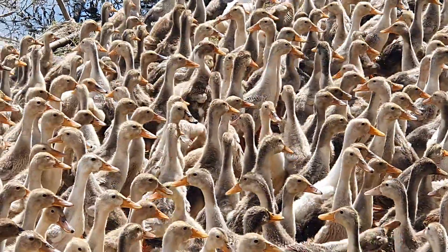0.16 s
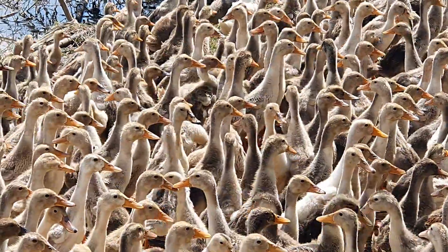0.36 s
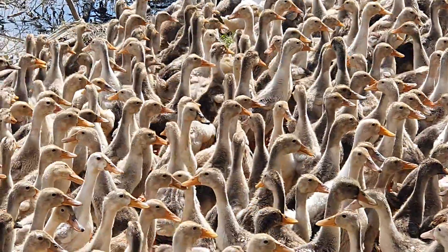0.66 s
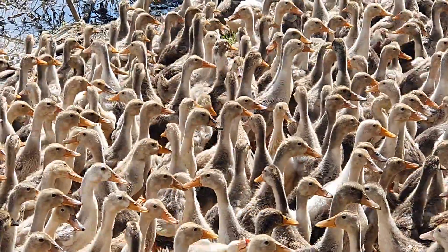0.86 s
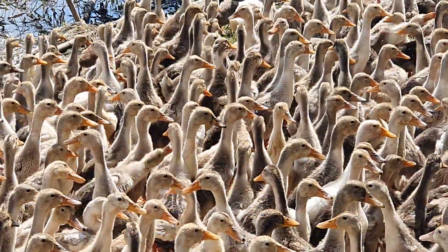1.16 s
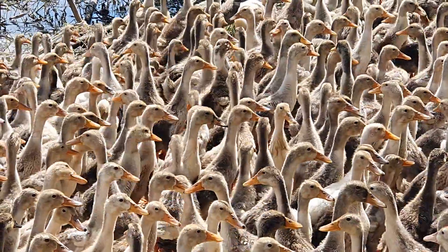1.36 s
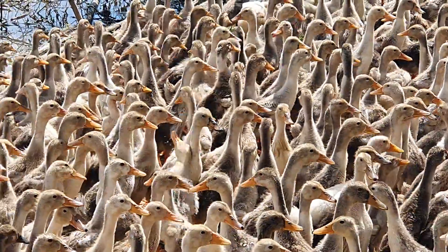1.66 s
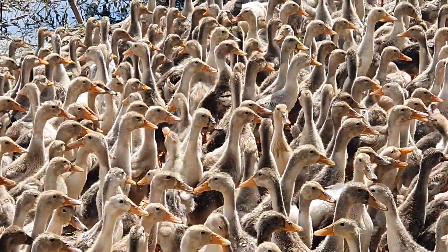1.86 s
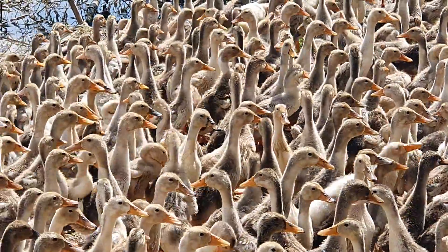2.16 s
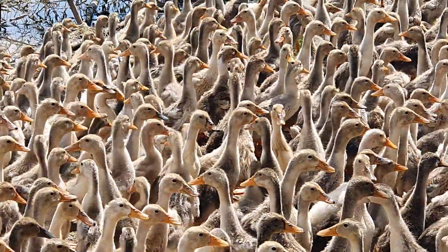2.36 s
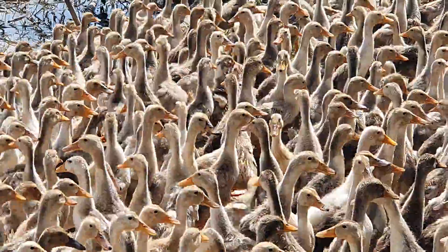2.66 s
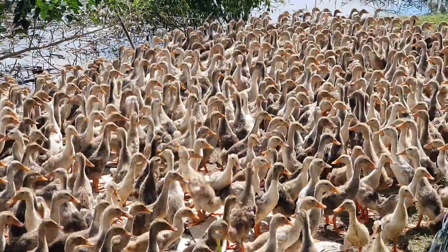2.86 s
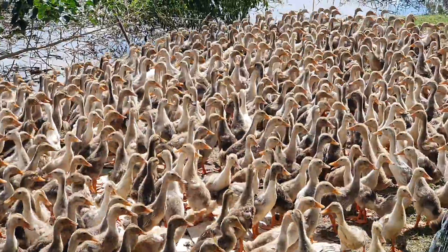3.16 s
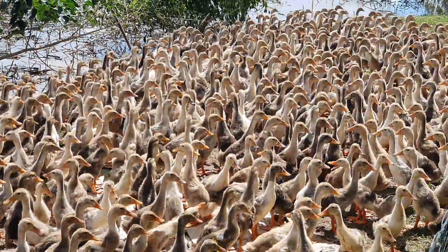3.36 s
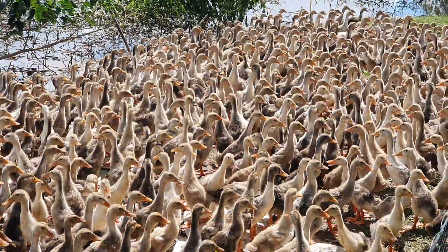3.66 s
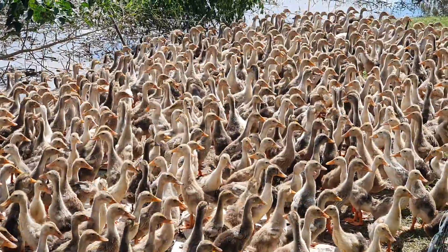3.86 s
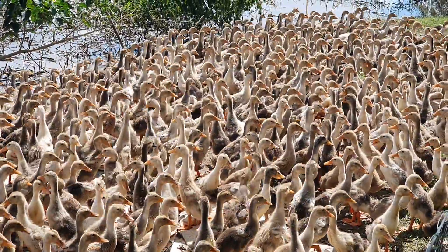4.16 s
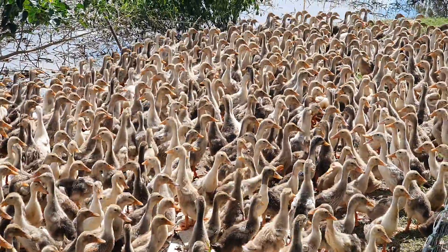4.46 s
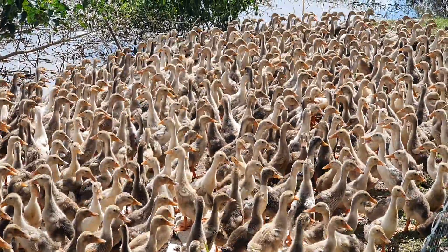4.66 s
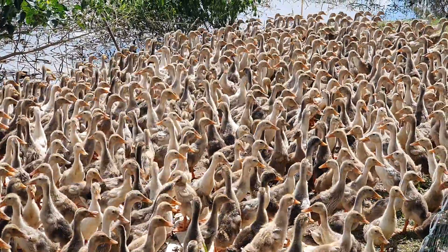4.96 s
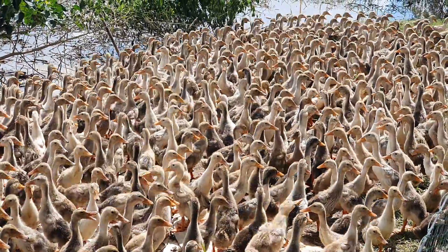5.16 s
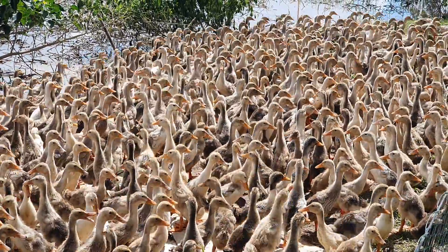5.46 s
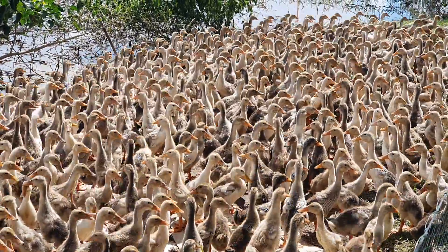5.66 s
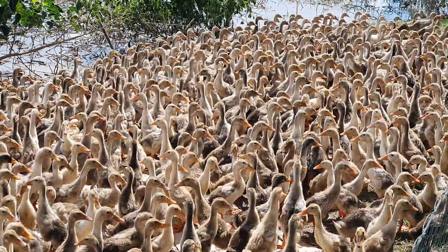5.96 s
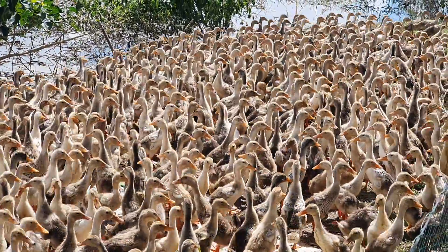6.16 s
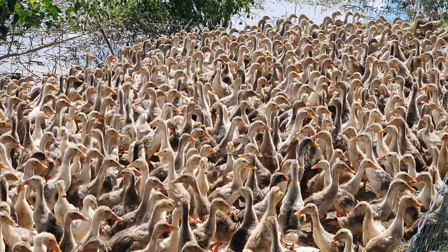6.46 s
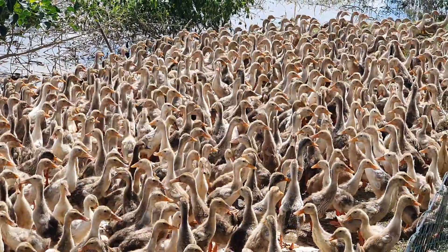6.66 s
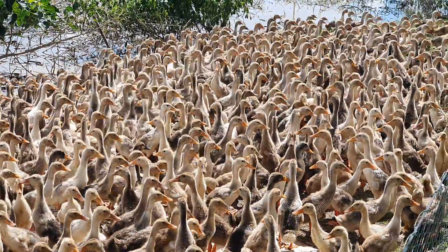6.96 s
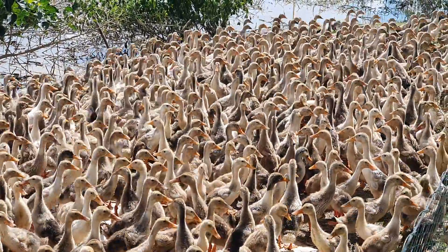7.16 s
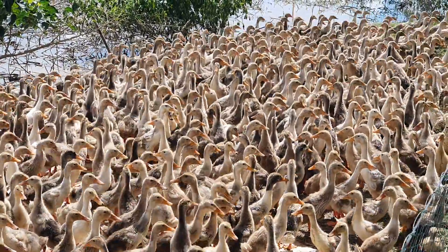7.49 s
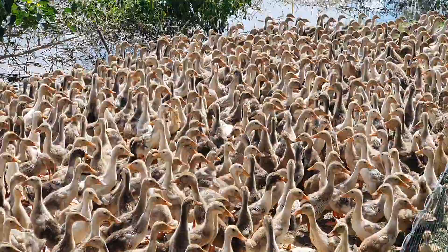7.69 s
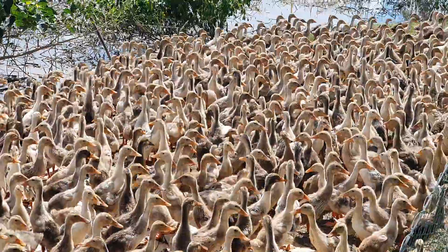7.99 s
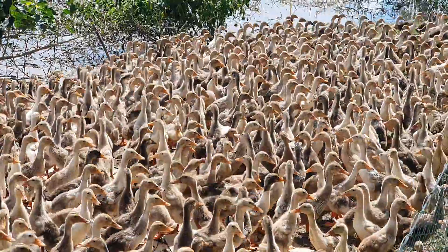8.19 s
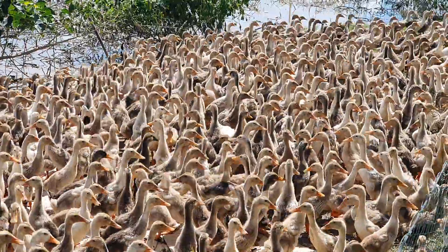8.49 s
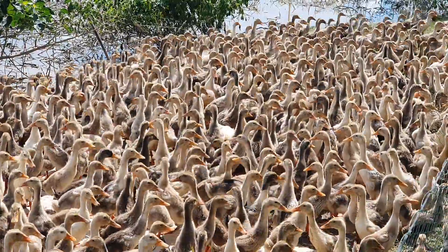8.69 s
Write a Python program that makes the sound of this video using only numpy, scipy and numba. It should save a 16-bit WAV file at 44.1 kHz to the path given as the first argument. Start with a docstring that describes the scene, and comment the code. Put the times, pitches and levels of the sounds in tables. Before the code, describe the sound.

Hundreds of young ducks peep and cluck together outdoors in a dense, continuous chorus, heard more on the right. Loud, close whistles and lower, raspy yelps poke through from the start, with a few soft quacks. Later come brief harsh squawks and thin squeals as the shrillness softens. The far birds blur into a patchy rush, and air and distant motors rumble very faintly underneath.

```python
"""An open yard, with a very large flock of young ducks calling to the right of a two-port microphone.
Most voices are still whistled peeps; breaking voices yelp an octave lower and turn hoarse as the
membrane in the throat flaps. Close by, peeps, yelps, squeals, honks, quacks and squawks stand out
with a short echo. Behind them is a dense chorus, the far flock melts into a patchy rush, and a
faint rumble of air and distant motors lies below."""
import sys
import numpy as np
from scipy import signal
from scipy.fft import rfft, irfft, next_fast_len
from scipy.io import wavfile
from scipy.ndimage import uniform_filter1d, map_coordinates
from numba import njit

SR = 44100
rng = np.random.default_rng(int(sys.argv[2]) if len(sys.argv) > 2 else 0)


def transcribe(u):
    """Save the signal u as a 16-bit wav file named by the first command-line argument.

    u: samples, shape (n,) or (channels, n), limited to [-1, 1]; the rate is SR.
    q: integer samples, one column per channel.
    """
    v = np.clip(np.atleast_2d(u).T, -1, 1)
    q = np.round(v * 32767).astype(np.int16)
    wavfile.write(sys.argv[1], SR, q)


N = 389403
TIME_S = np.arange(N) / SR
TOP_HZ, FLAP_HZ = 15720, 360  # band limit of the microphone; flap rate of a hoarse membrane

# Peeps close to the microphone: start_s, length_s, pitch_hz, climb_share_per_s, level_db, overtone_db
PEEPS = [(.082, .098, 3170, .8, -17, -22), (.16, .093, 3000, .4, -20, -3),
         (.356, 0.108, 3170, .8, -15, -14), (0.47, .088, 2960, .8, -17, -12),
         (.652, .096, 3130, .8, -17, -14), (0.75, 0.1, 2980, .8, -21.5, 0), (0.952, 0.055, 3540, 0, -33, 9),
         (0.993, 0.051, 3156, 2, -18.5, -7), (1.079, 0.094, 2875, 0.5, -23, -2),
         (1.226, 0.081, 3100, 1.7, -26.5, -7), (1.486, 0.037, 2744, 2, -27, -6),
         (1.602, 0.05, 2673, 3.5, -22, -9), (1.839, 0.1, 2725, -1.2, -22, -8),
         (1.935, 0.075, 2810, 0.5, -24.5, 3.5), (2.04, 0.083, 2440, 0.2, -28.5, 14),
         (2.09, .042, 2850, .6, -23, 6), (2.198, 0.082, 2920, 1.1, -22.5, 3),
         (2.436, 0.069, 2910, 1, -16.5, -1), (2.674, 0.089, 2890, 1.2, -15.5, -0.5),
         (2.857, 0.12, 3040, 0.8, -26, -6), (2.93, 0.058, 2820, 3, -18, -2),
         (2.978, 0.073, 3120, 2, -22.5, 14.5), (3.09, 0.063, 2705, 1, -22.5, 1.5),
         (3.286, 0.098, 2550, 1, -31, -14), (3.465, 0.064, 3265, 0, -29, -8),
         (3.751, 0.064, 2280, 1, -24, -13), (4.104, 0.057, 2450, 0, -18.5, -6),
         (4.38, 0.098, 2520, 2, -26.5, -7), (4.467, 0.082, 2180, 0, -27, 3),
         (4.657, 0.077, 2105, 1, -26, -7), (4.676, 0.04, 2460, 3.5, -32, 16),
         (4.691, 0.051, 2690, -1.5, -26, -2), (4.923, 0.078, 2295, 1.5, -23.5, 4),
         (5.14, 0.055, 2690, -1, -24, -8), (5.179, 0.084, 2276, 0, -23, -14),
         (5.237, 0.066, 2670, -1, -26, -7), (5.387, 0.055, 2804, 2, -23.5, -21),
         (5.465, 0.088, 2264, -0.5, -27, -13), (5.631, 0.072, 2387, 0.3, -20.5, -1.5),
         (6.492, 0.052, 2640, -.5, -23, -1), (6.139, 0.054, 2398, 1, -22.5, -10),
         (6.828, 0.078, 2330, -1.4, -23, -3), (7.145, 0.053, 3080, 1, -26.5, 2),
         (7.441, 0.054, 3050, 1.5, -23.5, -12), (7.71, .075, 3033, 1, -25, -2),
         (8.017, .065, 3015, 1.8, -26, 3), (7.715, 0.064, 2210, 0, -31, 0),
         (7.836, 0.1, 2610, -1, -25, -6.5), (8, 0.068, 2224, 1, -29.5, 1),
         (8.29, 0.067, 3146, 0.5, -26.5, -6), (8.587, 0.062, 3167, -0.8, -32.5, -11)]
def peeps():
    """Young birds whistle: the pitch glides, bows up in the middle and hooks down at the end."""
    start, length, hz, climb, db, overtone_db = np.transpose(PEEPS)
    glide = climb * length / 2
    arch = hz * np.array([1 - glide, np.full_like(hz, 1.016), 1 + glide])
    left_db = curves(CHORUS, start)[-1] + .24  # from the same side as the flock
    return voices(start, length, arch, db, left_db, overtone_db=overtone_db, count=2,
                  quiver=.0025, flutter_db=1.5, skew=1., edge_s=.009, hook=.12)[:2]


# One long peep, close by: start_s, length_s, start_hz, middle_hz, end_hz, level_db, overtone_db
LONG_PEEP = [(6.44, .18, 2930, 3195, 3010, -18, -8)]
def long_peep():
    """A held whistle that scoops up and sinks."""
    start, length, *arch, db, overtone_db = np.transpose(LONG_PEEP)
    return voices(start, length, np.array(arch), db, left_db=-7, overtone_db=overtone_db, count=2,
                  quiver=.002, flutter_db=1.2, skew=.55, edge_s=.022)[:2]


# Squeals close by, well to the right: start_s, length_s, pitch_hz, level_db
SQUEALS = [(5.572, .07, 5580, -33), (5.845, .075, 5580, -33), (6.12, .08, 5620, -33)]
def squeals():
    """High, raspy, arched notes; the membrane also flaps weakly at half the pitch."""
    start, length, hz, db = np.transpose(SQUEALS)
    arch = np.outer((1, 1.03, .97), hz)
    return voices(start, length, arch, db, left_db=-10.5, note_partial=2, between_db=-18, count=2,
                  quiver=.016, flutter_db=4., skew=3., edge_s=.009)[:2]


# Yelps close by: start_s, length_s, pitch_hz, level_db
YELPS = [(0.16, 0.056, 1317, -41.5), (0.232, 0.0466, 1316, -35.5), (0.303, 0.037, 1296, -36),
         (0.811, 0.067, 1482, -34.5), (1.008, 0.036, 1586, -37), (1.112, 0.047, 1480, -43),
         (1.342, 0.049, 1188, -35.5), (1.552, 0.065, 1513, -36), (1.692, 0.022, 1240, -33.5),
         (1.825, 0.0715, 1190, -35.5), (1.957, 0.0363, 1180, -35), (2.203, 0.051, 1213, -30.5),
         (2.444, 0.033, 1258, -28.5), (2.695, 0.028, 1256, -26), (2.79, 0.0346, 1210, -31),
         (2.995, 0.032, 1302, -25.5), (3.04, 0.062, 1253, -32.5), (3.141, 0.031, 1285, -35),
         (3.229, 0.061, 1380, -38), (3.366, 0.034, 1287, -31), (3.437, 0.029, 1300, -41.5),
         (3.634, 0.054, 1303, -35.5), (3.992, 0.024, 1370, -40), (4.084, 0.0392, 1352, -32),
         (4.302, 0.107, 1314, -38), (4.517, 0.039, 1400, -33), (4.621, 0.098, 1346, -39.5),
         (4.725, 0.061, 1420, -35.5), (5.01, 0.076, 1464, -41), (5.288, 0.048, 1405, -30.5),
         (5.325, 0.044, 1404, -34), (5.553, 0.054, 1406, -30.5), (5.854, 0.03, 1290, -28),
         (5.965, 0.036, 1420, -38), (6.096, 0.056, 1328, -30.5), (6.374, 0.035, 1390, -36.5),
         (6.536, 0.05, 1350, -37), (6.819, 0.094, 1280, -40.5), (7.036, 0.061, 1426, -40),
         (7.11, 0.023, 1300, -36.5), (7.131, 0.04, 1360, -39), (7.176, 0.091, 1307, -37),
         (7.267, 0.067, 1407, -38), (7.434, 0.021, 1370, -33.5), (7.497, 0.072, 1255, -35),
         (7.654, 0.027, 1314, -30.5), (7.973, 0.025, 1365, -34.5), (8.012, 0.0327, 1416, -32.5),
         (8.234, 0.025, 1386, -36), (8.317, 0.049, 1374, -29.5), (8.493, 0.056, 1297, -37.5),
         (8.658, 0.05, 1356, -40), (8.715, 0.063, 1410, -27.5)]
def yelps(breath):
    """Breaking voices with weak overtones; every call falls in pitch."""
    start, length, hz, db = np.transpose(YELPS)
    sag_hz = 3490 * np.minimum(length, .05) * rng.uniform(.7, 1.3, len(start))
    return hoarse_voices(start, length, falling(hz, sag_hz), db, breath,
                         overtone_db=-20, hoarse_db=-6, breath_db=-13)


# One bird honking close by: start_s, length_s, level_db
HONKS = [(0.241, 0.053, -45.5), (0.747, 0.038, -43), (2.069, 0.088, -51.5), (4.002, 0.042, -49.5),
         (4.241, 0.036, -48)]
def honks(breath):
    """A brassy, almost steady note; the membrane also flaps at half the pitch."""
    start, length, db = np.transpose(HONKS)
    arch = falling(np.full_like(start, 1414), span_hz=34)
    calls = voices(start, length, arch, db, left_db=-6, note_partial=2, overtone_db=7, between_db=-1,
                   count=16, quiver=.008, flutter_db=3., skew=1.9, edge_s=.009)
    return breathy(calls, breath, breath_db=-15)


# The oldest birds, close by: start_s, length_s, pitch_hz, lowest_partial_db, overtone_db
QUACKS = [(0.38, 0.048, 368, -60, -16), (0.846, 0.036, 370, -58, -37), (1.108, 0.049, 390.5, -53, -18.5),
          (1.35, 0.098, 453, -61, -19), (1.509, 0.088, 424, -64.5, -15), (2.686, 0.056, 370, -70, -29),
          (5.131, 0.055, 353, -73, 3), (5.275, 0.1, 334.3, -64, -9.5), (6.139, .07, 434, -63.5, -18),
          (6.554, 0.11, 371, -72.5, -0.5), (6.832, 0.058, 357, -75, 1), (7.059, 0.024, 363, -70, -8),
          (7.292, .055, 380, -66, -9.5), (7.559, 0.048, 377.5, -68, -4.5), (8.029, 0.062, 363, -75.5, 2.5),
          (8.501, 0.049, 341, -71, 1.5)]
def quacks(breath):
    """Deep, breathy pulse trains whose upper partials ring in throat and bill."""
    start, length, hz, db, overtone_db = np.transpose(QUACKS)
    arch = np.outer((1.01, 1, .965), hz)
    calls = voices(start, length, arch, db, left_db=-6.5, overtone_db=overtone_db, count=24,
                   quiver=.007, flutter_db=3.5, skew=1.5, edge_s=.014)
    return breathy(calls, breath, breath_db=-8)


# Harsh squawks close by: start_s, length_s, level_db
SQUAWKS = [(3.272, .09, -29), (3.835, .055, -32), (6.57, .06, -36), (6.825, .065, -31), (8.265, .05, -33)]
# Their tone colour: frequency_hz, density_db
SQUAWK_SPECTRUM = [(1800, -40), (2800, 0), (4400, 8), (5500, 0), (7200, -8), (9000, -40)]
def squawks():
    """Bursts of bright air noise, chopped by the flapping membrane."""
    swell = sum(amp(db) * np.sin(np.pi * np.clip((TIME_S - start) / length, 0, 1))
                for start, length, db in SQUAWKS)
    chopped = unit((1 + np.cos(2 * np.pi * FLAP_HZ * TIME_S)) ** 2)
    return swell * chopped * rush(SQUAWK_SPECTRUM, alike=.6, patchy_db=2) * amp([[-9], [0]])


# Breath in the calls, from the right: frequency_hz, density_db
BREATH_SPECTRUM = [(900, -18), (1500, 7.5), (4000, 1.5), (6500, 5), (9000, -18.5), (12000, -25.5),
                   (15700, -26)]
def breath_noise():
    """Air rasping past the membrane."""
    return rush(BREATH_SPECTRUM, alike=.5, patchy_db=7) * amp([[-10], [0]])


def breathy(calls, breath, breath_db):
    """Stereo calls with air noise that follows their envelope."""
    return calls[:2] + amp(breath_db) * calls[2] * breath


def hoarse_voices(start, length, arch, db, breath, overtone_db, hoarse_db, breath_db):
    """The membrane also flaps near FLAP_HZ, which fills the gaps between the overtones."""
    calls = voices(start, length, arch, db, left_db=-8, count=32,
                   note_partial=np.round(arch[1] / FLAP_HZ).astype(int),
                   overtone_db=overtone_db, between_db=overtone_db + hoarse_db,
                   quiver=.009, flutter_db=2.5, skew=1.5, edge_s=.012, lead_s=.0006, scatter_s=.0001)
    return breathy(calls, breath, breath_db)


# What throat and bill let through: frequency_hz, gain_db
THROAT = [(150, -69), (250, -35.5), (996, -47), (1180, -7), (1340, -16), (1670, -30), (2210, -3.5),
          (2670, -3), (3170, -4), (3840, -11), (4480, -13), (5810, -18.5), (7270, -18), (8790, -52.5),
          (15600, -36.5)]
def voices(start, length, arch, db, left_db, count, quiver, flutter_db, skew, edge_s,
           note_partial=1, overtone_db=0, between_db=0, lead_s=.0005, scatter_s=.0003, hook=0.):
    """Pulse trains of count partials, shaped by the throat; returns left, right and envelope."""
    k = np.arange(1, count + 1)
    note = np.broadcast_to(note_partial, start.shape)[:, None]
    note_hz = arch[1][:, None]
    partial_hz = note_hz * k / note
    shape_db = along(THROAT, partial_hz) - along(THROAT, note_hz)
    # multiples of the sung note are overtones; the partials between them make the voice hoarse
    trim_db = np.where(k % note == 0, np.c_[overtone_db], np.c_[between_db])
    chance = rng.standard_normal((len(start), 2 * count + 1))
    shape_db += (trim_db + 3 * chance[:, :count]) * (k != note)
    phases = np.exp(1.2j * chance[:, count:-1])
    partials = amp(db[:, None] + shape_db) * (partial_hz < TOP_HZ) * phases
    lead = np.clip((lead_s + scatter_s * chance[:, -1]) * SR, 0, None)  # the left port hears it first
    calls = np.c_[start, length, arch.T / note, amp(left_db + 0 * start), lead]
    pitch_wobble = quiver * slow(knots=2600)
    flutter = amp(flutter_db * slow(knots=2600))
    return sing(calls, partials, pitch_wobble, flutter, skew, edge_s, hook)


@njit
def sing(calls, partials, pitch_wobble, flutter, skew, edge_s, hook):
    """Sums soft-edged calls, each on a pitch arch through three points; skew above 1 bends it late."""
    out = np.zeros((3, N))
    for c in range(len(calls)):
        start, length, start_hz, middle_hz, end_hz, left_gain, lead = calls[c]
        first, n = int(start * SR), int(length * SR)
        phase, mid = 0., .5 ** skew
        loudest = np.abs(partials[c]).max()
        for i in range(max(0, -first), min(n, N - first - int(lead))):
            v = (i / n) ** skew
            own = (first + i + 371 * c) % N  # each bird wavers in its own way
            hz = (start_hz * (v - mid) * (v - 1) / mid
                  + middle_hz * v * (v - 1) / (mid * (mid - 1))
                  + end_hz * v * (v - mid) / (1 - mid))
            hz *= 1 - hook * max(0., 1 - (n - i) / (.03 * SR)) ** 2  # drop over the last 30 ms
            phase += 2 * np.pi * hz * (1 + pitch_wobble[own]) / SR
            edge = min(1., min(1.3 * i, n - i) / (edge_s * SR))
            envelope = flutter[own] * np.sin(np.pi / 2 * edge) ** 2
            fundamental = np.exp(1j * phase)
            harmonic, wave = fundamental, 0.
            for gain in partials[c]:
                wave += (gain * harmonic).imag
                harmonic *= fundamental
            out[0, first + i] += left_gain * envelope * wave
            out[1, first + i + int(lead)] += envelope * wave
            out[2, first + i] += envelope * loudest
    return out


def yard_echo(close, t60_s=.22):
    """Short scattered echoes off the bodies and the bank."""
    t = np.arange(SR // 4) / SR
    tail = rng.standard_normal((2, len(t))) * amp(-60 * t / t60_s) * (t > .004)
    return signal.fftconvolve(close, tail / np.linalg.norm(tail[0]), axes=1)[:, :N]


def crowd(count, centre_hz, spread, rise, fall, length_s, scatter_db):
    """Start, length, pitch arch and level of random calls; the throat favours some pitches."""
    start = rng.random(count) * (N / SR + .1) - .1
    pitch, onset, ending, duration, level = rng.standard_normal((5, count))
    hz = centre_hz * np.exp(2 * spread * np.tanh(pitch / 2))  # few birds stray far from the common pitch
    drop = fall * np.exp(.624 * np.clip(ending, -3, 1.1))
    arch = hz * np.array([1 + rise + .03956 * onset, np.ones(count), 1 - drop])
    db = scatter_db * np.clip(level, -3, 1.5) + .48 * along(THROAT, hz)
    return start, length_s * np.exp(.25 * duration), arch, db


def crowd_peeps(birds=1500):
    """Overlapping whistles, scattered widely from left to right."""
    calls = crowd(birds, centre_hz=2520, spread=.13, rise=-.015, fall=.065, length_s=.05, scatter_db=5.5)
    return unit(voices(*calls, left_db=5 * rng.standard_normal(birds), overtone_db=-1.9, count=2,
                       quiver=.011, flutter_db=2.5, skew=1.4, edge_s=.016)[:2])


def crowd_squeals(birds=1700):
    """Thin, high whistles that make the chorus shrill."""
    calls = crowd(birds, centre_hz=5714, spread=.2, rise=.0072, fall=.036, length_s=.048, scatter_db=2.5)
    return unit(voices(*calls, left_db=2.1 * rng.standard_normal(birds), count=1,
                       quiver=.0154, flutter_db=2.5, skew=1.494, edge_s=.037)[:2])


# Clucking from within the flock: time_s, level_db
CLUCKING = [(0.0, -49.5), (0.47, -41), (1.01, -45.5), (2.26, -50), (2.61, -43), (3.44, -43.5), (3.86, -49),
            (4.57, -47.5), (4.75, -51), (5.56, -53.5), (6.1, -46.5), (6.69, -61.5), (6.88, -45.5),
            (7.03, -44.5), (8.12, -53.5), (8.58, -46), (8.68, -41), (8.83, -54)]
def clucks(breath, count=330):
    """Short calls of breaking voices at a nearly even pace."""
    _, length, arch, db = crowd(count, centre_hz=1303, spread=.079, rise=.0492, fall=.089,
                                length_s=.0341, scatter_db=2.5)
    start = np.linspace(0, N / SR, count) + .0079 * rng.standard_normal(count)
    calls = hoarse_voices(start, length, arch, db, breath,
                          overtone_db=-14 + 4 * rng.standard_normal(count),
                          hoarse_db=-26.5, breath_db=-38.5)
    return amp(curves(CLUCKING, TIME_S)[0]) * unit(calls)


# The body of the flock, farther off: time_s, shrill_db, hiss_db, left_against_right_db
CHORUS = [(0.0, -41.5, -56.5, -4), (0.59, -40, -53.5, -6), (0.73, -43, -50, -5.5), (1.45, -36, -58.5, -6),
          (2.92, -39, -56, -4), (3.49, -42, -71, -8), (4.3, -45, -70.5, -7.5), (7.92, -58.5, -68, -7),
          (8.83, -59.5, -67, -6)]
# Swells and lulls of its peeping: time_s, relative_level_db
SURGES = [(0.0, -30), (1.7, -31.5), (2.29, -29), (2.36, -28.5), (2.48, -29.5), (2.88, -30), (2.92, -28.5),
          (3.69, -30.5), (3.79, -31), (3.96, -34), (4.13, -29.5), (4.2, -33.5), (4.52, -30), (4.65, -34),
          (4.67, -28), (4.92, -33), (4.94, -28.5), (5.11, -33), (5.19, -31), (5.36, -32.5), (5.61, -29.5),
          (5.68, -29.5), (5.7, -31.5), (6.27, -30), (6.42, -34), (6.52, -29), (6.57, -31.5), (6.62, -30),
          (6.69, -35.5), (6.88, -29), (6.98, -34.5), (7.08, -29), (7.55, -33), (7.6, -30.5), (7.8, -33.5),
          (7.89, -29.5), (7.94, -32), (8.83, -33)]
def chorus(breath):
    """Hundreds of peeps, squeals and clucks with a rasp of air, and the far flock behind them."""
    shrill_db, hiss_db, left_db = curves(CHORUS, TIME_S)
    peep_db = curves(SURGES, TIME_S)[0] + 4.5
    whistles = amp(peep_db) * crowd_peeps() + amp(shrill_db) * crowd_squeals()
    clucking = clucks(breath)
    far = amp(peep_db - 3) * far_flock()
    hiss = amp(hiss_db) * bill_hiss()
    rasp = amp(shrill_db - 3.5) * breath
    return amp([left_db, np.zeros(N)]) * (whistles + far + hiss) + clucking + rasp


# Hiss over the flock: frequency_hz, density_db
HISS_SPECTRUM = [(5000, -9), (8500, -6), (12000, -1.5), (15700, -3.5)]
def bill_hiss():
    """Air through many bills, flickering in level."""
    flicker_db = 4.5 * slow(knots=160)
    return amp(flicker_db) * rush(HISS_SPECTRUM, alike=.063, patchy_db=3.5)


# The birds farthest from the microphone: frequency_hz, density_db
FAR_SPECTRUM = [(410, -71), (700, -36), (1020, -35.5), (1320, -38), (1780, -15.5), (2160, -5), (2500, 6.5),
                (3830, -12.5), (7050, -21), (8020, -31), (8900, -60.5), (11700, -38.5), (15600, -50)]
def far_flock():
    """Distant calls melt into a patchy rush."""
    return rush(FAR_SPECTRUM, alike=.037, patchy_db=3.5)


# Low background of the yard: frequency_hz, density_db
RUMBLE_SPECTRUM = [(12, -46), (20, -12.5), (71, 2.5), (157, -7), (381, -4.5), (537, -11), (952, -11.5),
                   (1000, -20), (1300, -35), (2200, -120)]
# Its slow drift: time_s, relative_level_db
RUMBLE_LEVEL = [(0.0, -66), (5.19, -70.5), (8.83, -69)]
def rumble():
    """Air and distant motors, stronger on the right and much the same all along."""
    air = rush(RUMBLE_SPECTRUM, alike=.2, patchy_db=.4, left_lag_s=.002)
    return amp(curves(RUMBLE_LEVEL, TIME_S)[0] + [[-6], [4]]) * air


def rush(spectrum, alike, patchy_db, left_lag_s=-.0005):
    """Stereo noise, patchy in time and frequency; alike (0-1) sets how much both ports share."""
    cells = signal.stft(rng.standard_normal((2, N)), nperseg=512)[2]
    patches = uniform_filter1d(rng.standard_normal(cells.shape[1:]), 5, axis=0)
    patches = uniform_filter1d(patches, 8, axis=1)
    shared, own = signal.istft(cells * amp(patchy_db * unit(patches)), nperseg=512)[1][:, :N]
    left = alike * np.roll(shared, round(left_lag_s * SR)) + np.sqrt(1 - alike ** 2) * own
    return unit(filtered(np.array([left, shared]), lambda hz: amp(along(spectrum, hz))))


def amp(db):
    """Gain of a level in dB."""
    return 10 ** (np.asarray(db) / 20)


def unit(x):
    """Scaled to rms 1."""
    return x / np.sqrt(np.mean(x ** 2) + 1e-20)


def along(spectrum, hz):
    """Level of a spectrum at hz, interpolated on a log frequency axis."""
    knots_hz, db = np.transpose(spectrum)
    return np.interp(np.log1p(hz), np.log1p(knots_hz), db)


def curves(rows, at_s):
    """The value of each column at the given times."""
    times, *columns = np.transpose(rows)
    return [np.interp(at_s, times, column) for column in columns]


def filtered(x, response):
    """x through a gain that depends on frequency."""
    size = next_fast_len(N + SR // 2)
    return irfft(rfft(x, size) * response(np.fft.rfftfreq(size, 1 / SR)), size)[..., :N]


def slow(knots):
    """A smooth random curve."""
    return map_coordinates(rng.standard_normal(knots), [np.linspace(0, knots - 1, N)])


def falling(hz, span_hz):
    """Start, middle and end pitch of a fall."""
    return np.array([hz + span_hz / 2, hz, hz - span_hz / 2])


def scene():
    """Near calls with their echoes, over chorus and rumble."""
    breath = breath_noise()
    close = peeps() + squeals() + long_peep() + yelps(breath) + honks(breath) + quacks(breath) + squawks()
    return close + amp(-17) * yard_echo(close) + chorus(breath) + rumble()


# The microphone's shaded left port against its right: frequency_hz, gain_db
LEFT_PORT = [(100, -1.5), (1300, -3), (2400, -3), (4400, -0.5), (8000, -2.5), (15000, 0.5)]
def record(dry):
    """The left port is a little weaker; the housing notches both, and nothing passes above TOP_HZ."""
    notch_hz, width_hz, depth = 4400, 563, .78

    def response(hz):
        notch = 1 - depth * np.exp(-((hz - notch_hz) / width_hz) ** 2)
        return amp([along(LEFT_PORT, hz), 0 * hz]) * notch * (hz < TOP_HZ)
    return filtered(dry, response)


dry = scene()
out = record(dry)
transcribe(out)
```